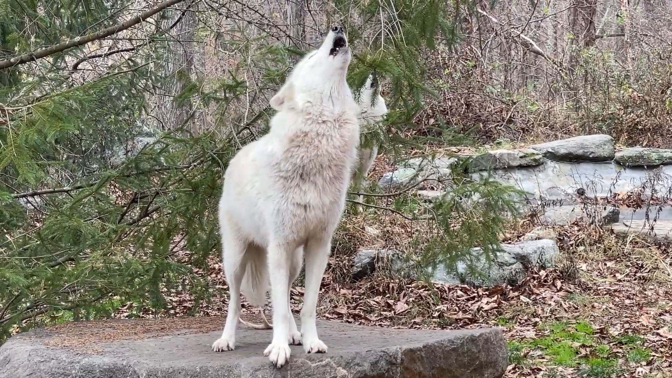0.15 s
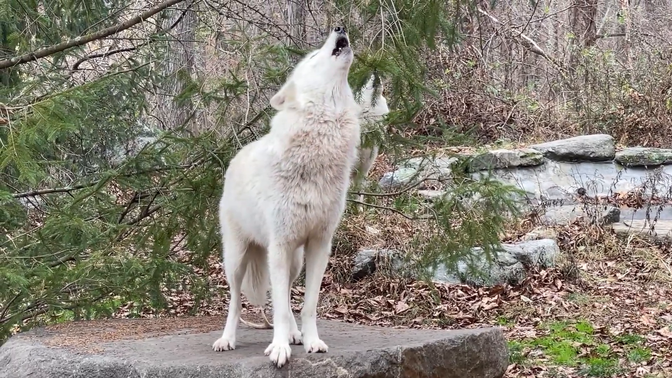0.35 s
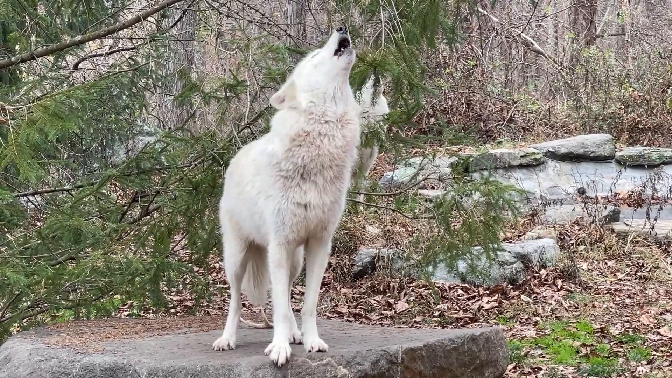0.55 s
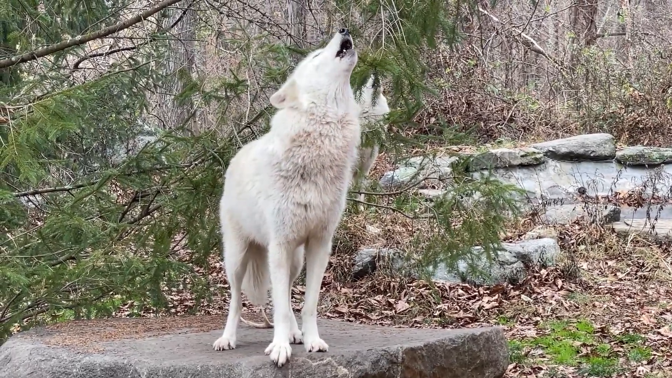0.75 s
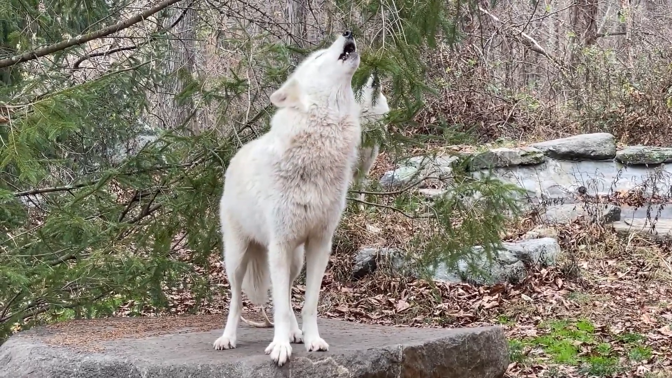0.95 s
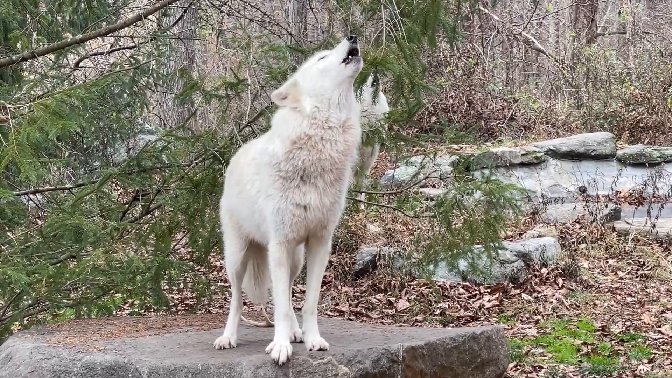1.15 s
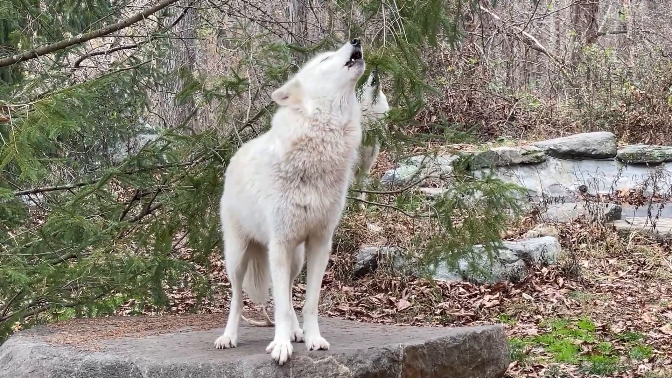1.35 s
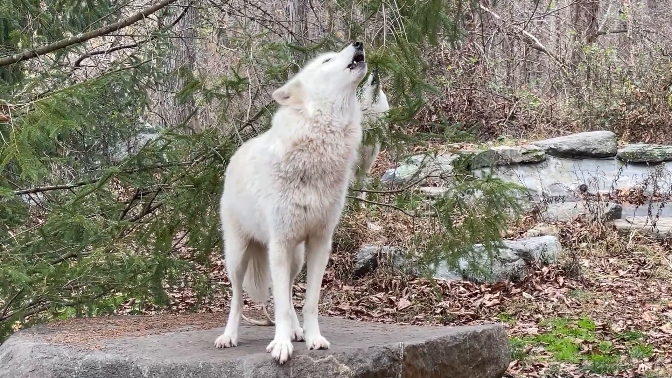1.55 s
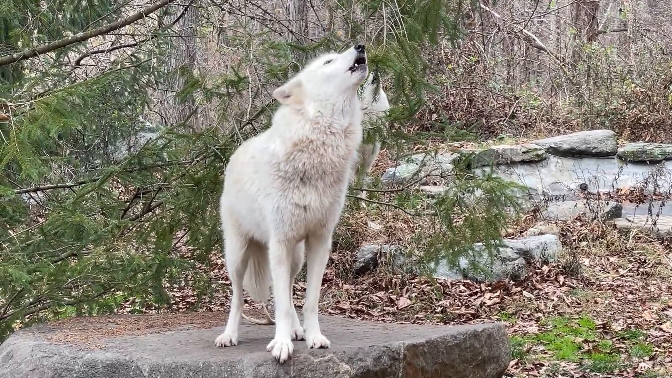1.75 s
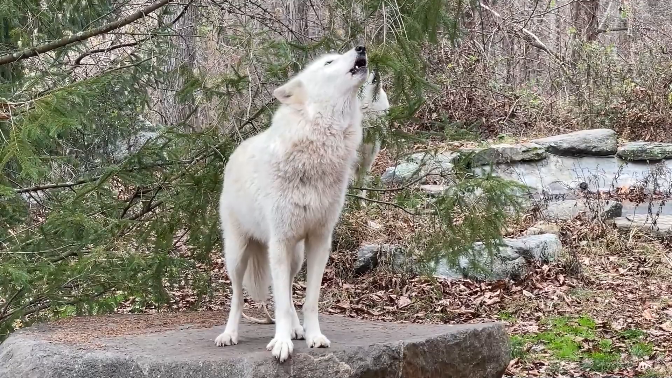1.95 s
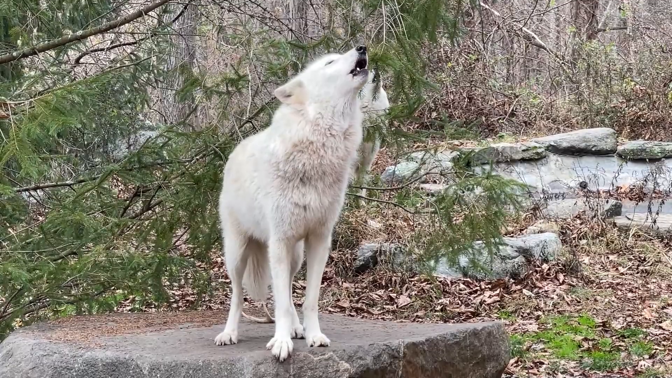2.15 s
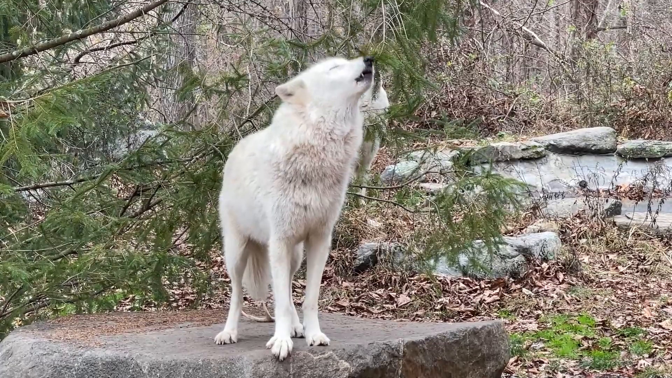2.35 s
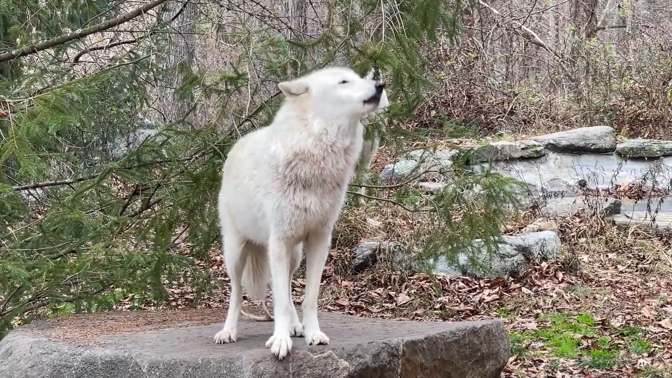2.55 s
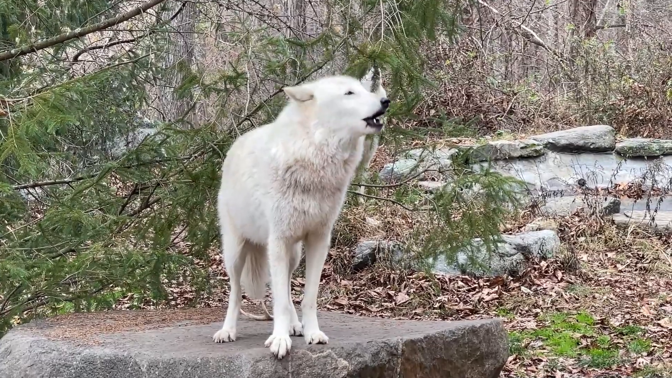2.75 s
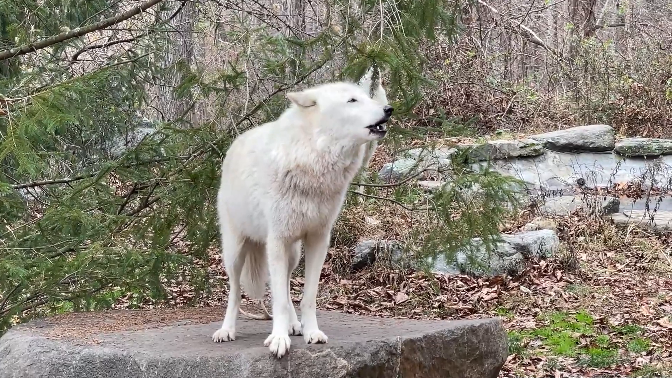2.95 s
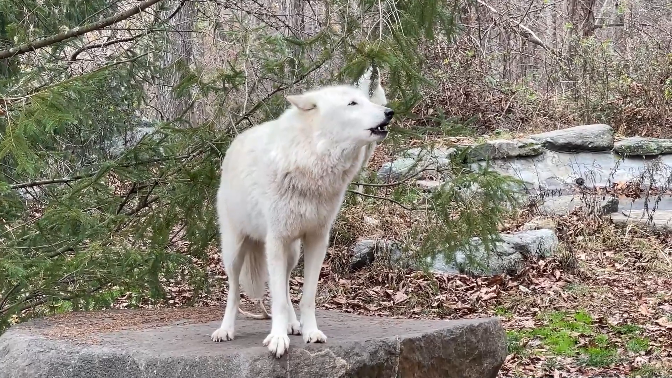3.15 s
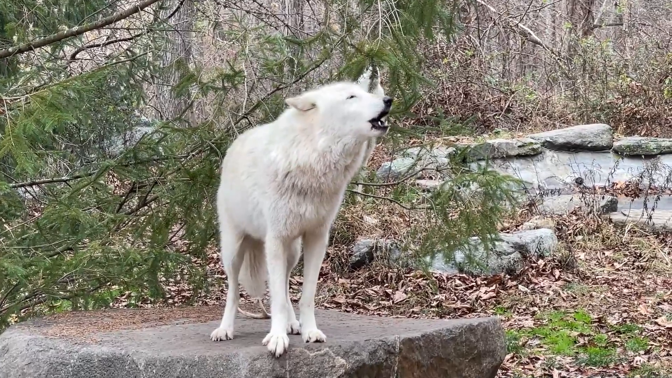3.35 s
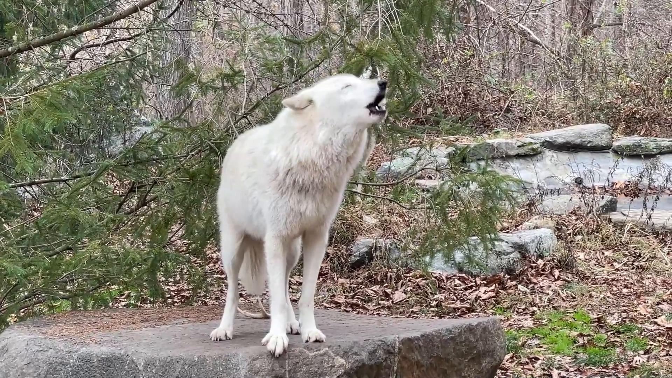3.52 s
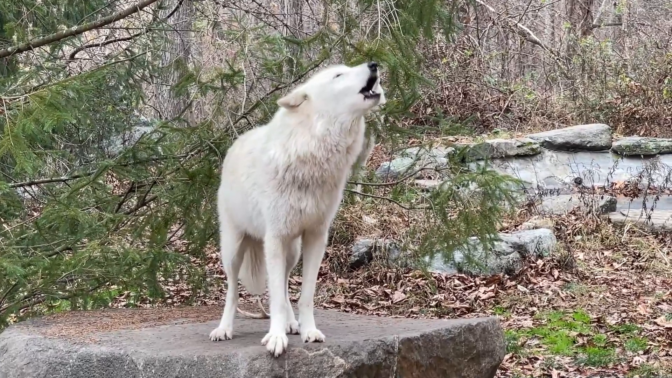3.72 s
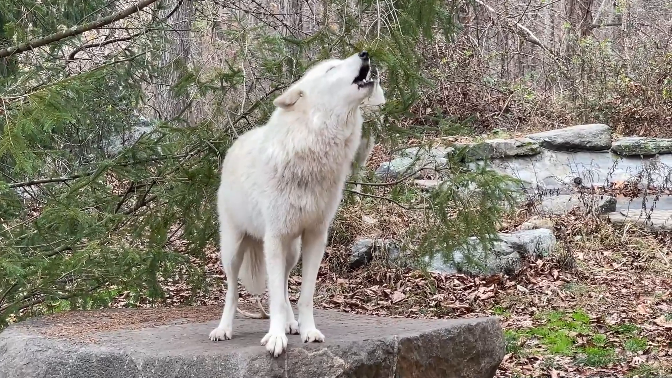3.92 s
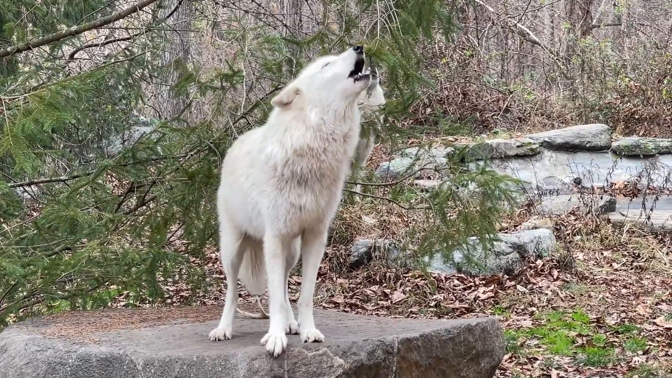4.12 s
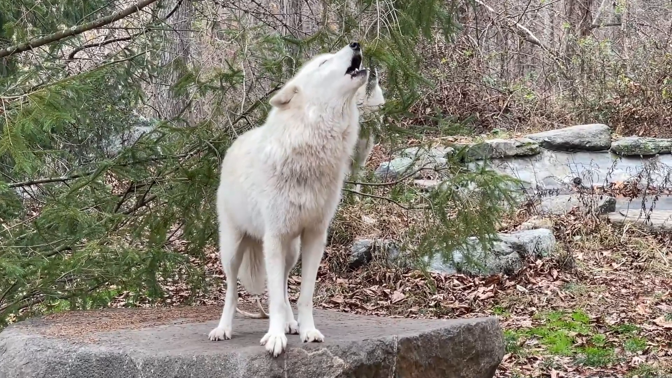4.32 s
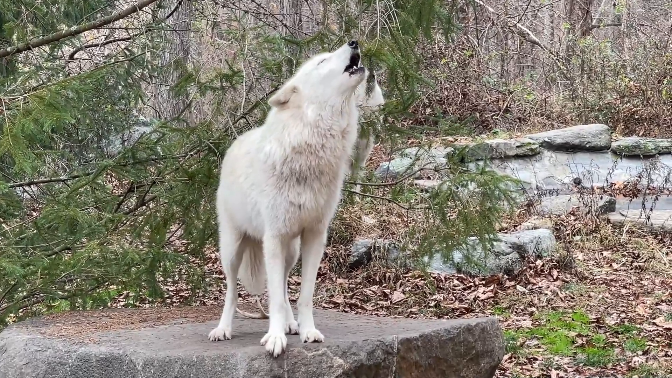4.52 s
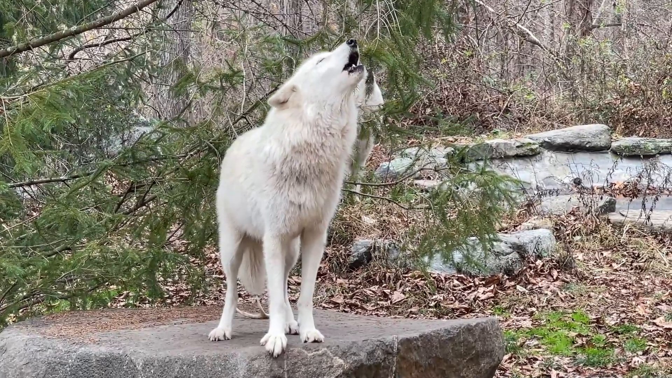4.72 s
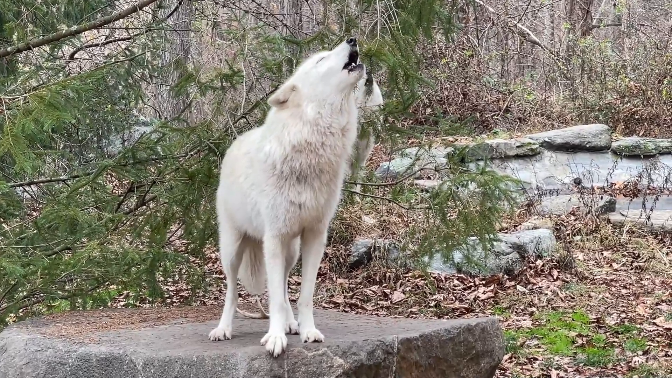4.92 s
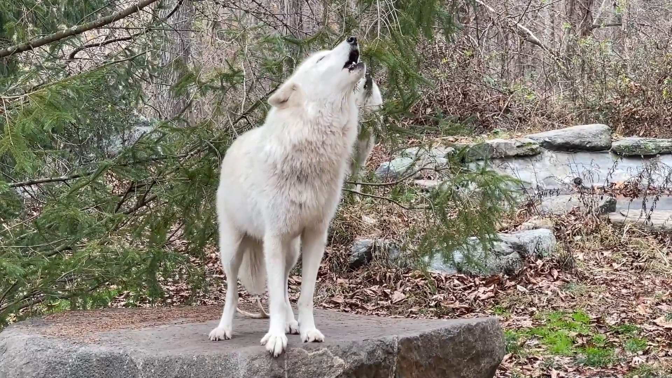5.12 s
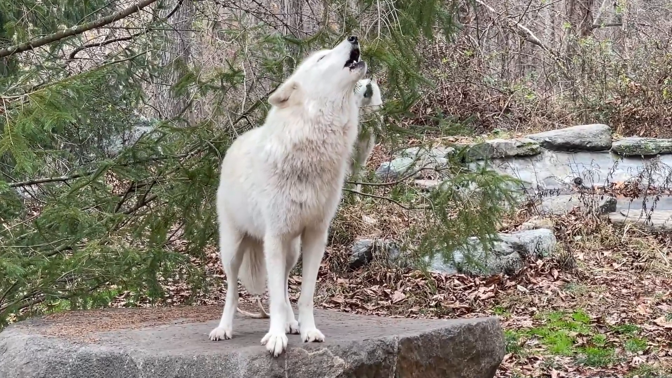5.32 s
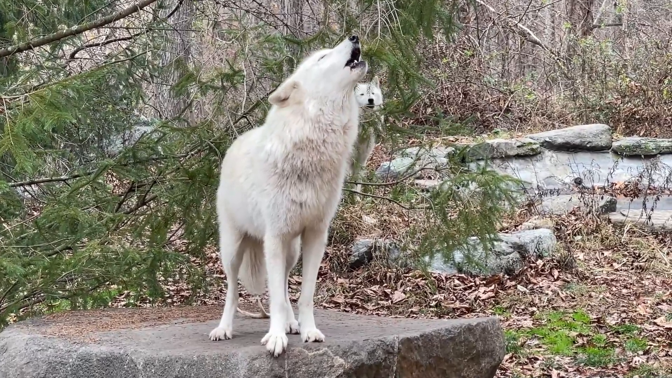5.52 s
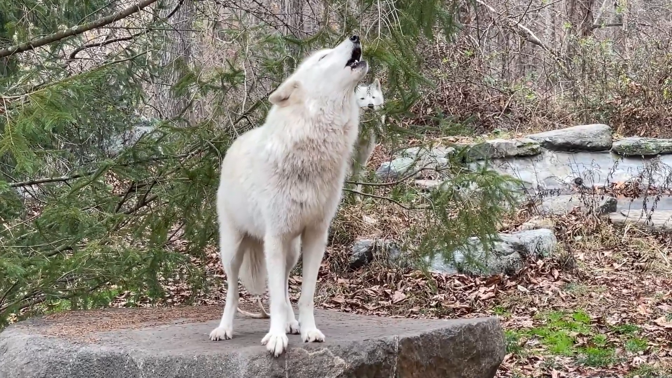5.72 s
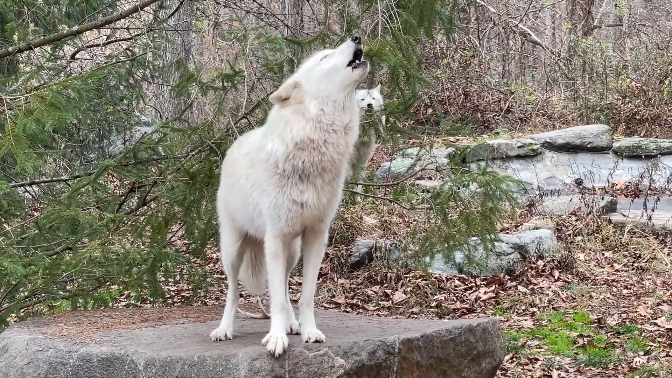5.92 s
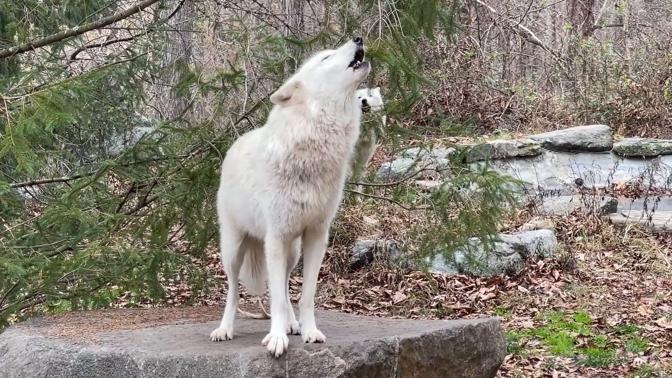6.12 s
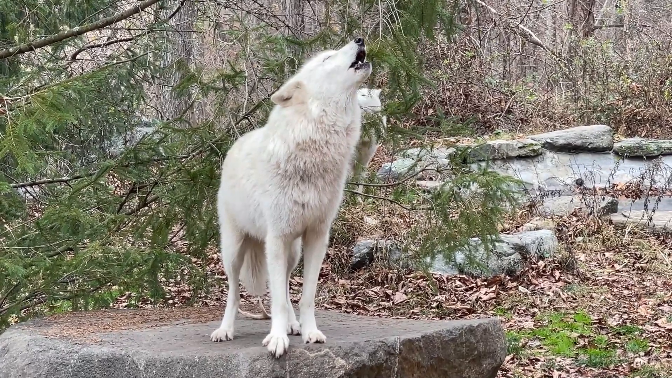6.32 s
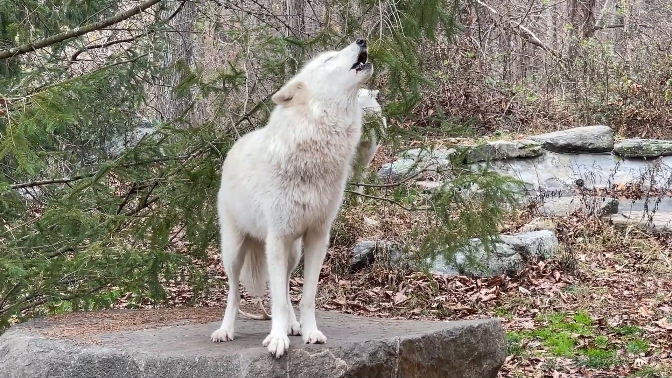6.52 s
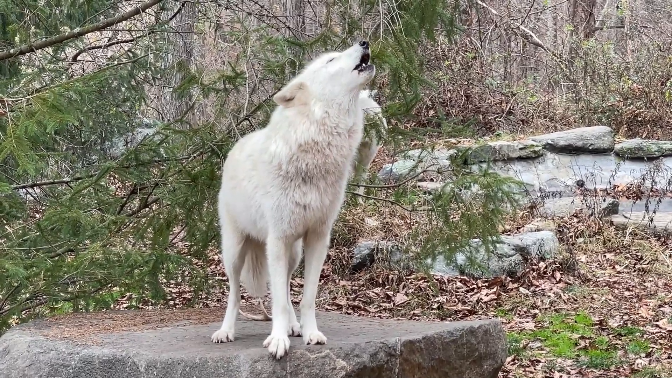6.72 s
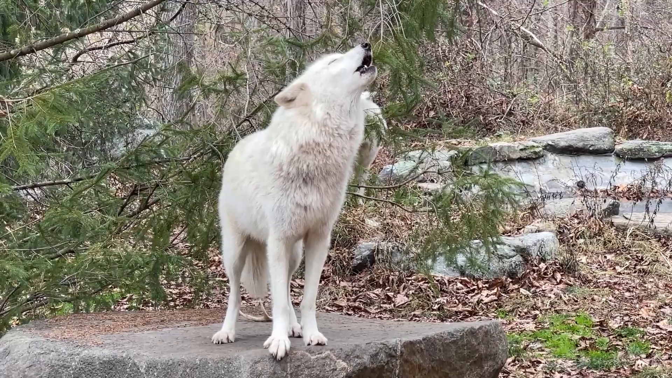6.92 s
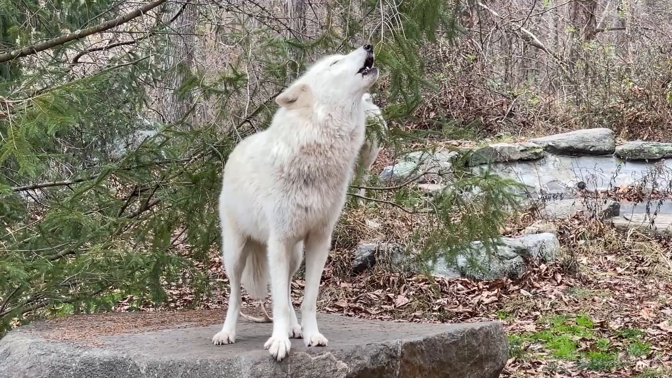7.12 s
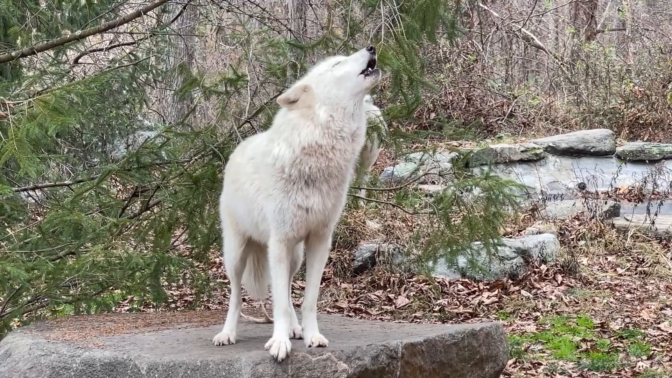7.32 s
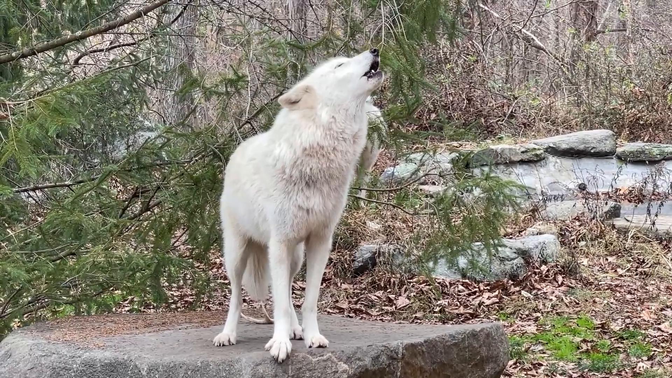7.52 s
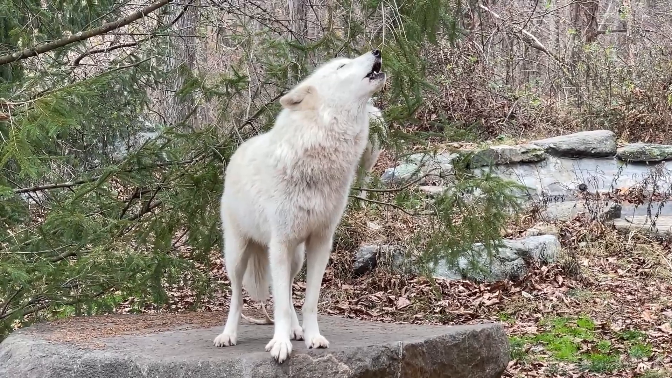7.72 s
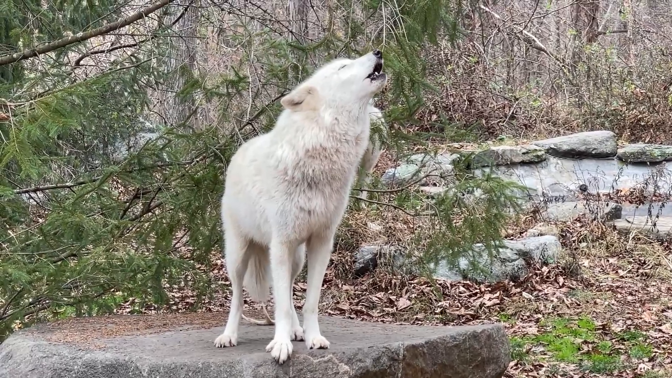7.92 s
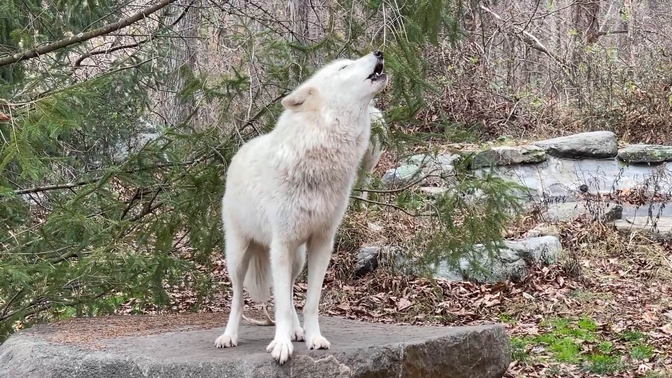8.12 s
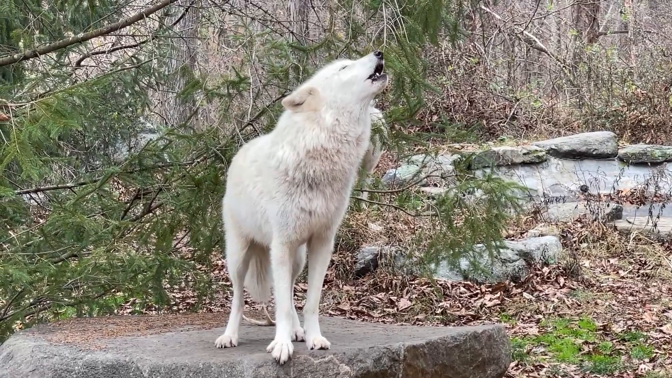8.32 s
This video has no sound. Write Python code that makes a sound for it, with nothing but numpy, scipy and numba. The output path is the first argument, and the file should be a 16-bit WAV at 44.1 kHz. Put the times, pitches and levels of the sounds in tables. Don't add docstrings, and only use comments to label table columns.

```python
import sys
import numpy as np
from scipy import signal
from scipy.fft import rfft, irfft
from scipy.io import wavfile
from scipy.ndimage import uniform_filter1d, minimum_filter1d
from numba import njit

SR = 44100
rng = np.random.default_rng(int(sys.argv[2]) if len(sys.argv) > 2 else 0)


def boost_factor(decibels):
    exponent = np.asarray(decibels, float) / 20
    return 10 ** exponent


def dump_mix(stems):
    frames = np.atleast_2d(stems).T
    limited = np.clip(frames, -1, 1)
    pcm = np.round(limited * 32767).astype(np.int16)
    wavfile.write(sys.argv[1], SR, pcm)


N = 373086
OPPOSITE = np.array([[1], [-1]])

# time_s, pitch_hz, level_db, mouth_opening_db
NEAR_HIGH = [(0.0, 477, -13.5, -52.5), (0.12, 470.3, -13, -50.5), (0.165, 451.3, -14.5, -50),
             (0.183, 410.5, -12, -49)]
NEAR_SAG = [(.24, 401, -14, -50), (.33, 395.7, -14, -51), (.56, 399, -14, -52.5), (.72, 412.2, -14, -49.5),
            (.85, 419, -13.5, -49), (1.3, 375.5, -15, -57), (1.6, 361.5, -14, -48), (1.87, 357.5, -14, -50),
            (1.91, 367.4, -13.5, -47.5)]
NEAR_RISE = [(1.95, 384.5, -13, -58.5), (2.05, 405.7, -12.5, -60), (2.11, 416.2, -13.5, -59)]
NEAR_STOP = [(2.16, 404, -14, -59.5), (2.19, 395, -30, -68.5), (2.23, 388, -54, -66)]
NEAR_CROAK = [(3.285, 366.9, -32, -48.5), (3.32, 345.3, -24.5, -66.5), (3.37, 351.3, -30, -43.5),
              (3.39, 384.6, -16, -50.5)]
NEAR_HOOT = [(3.393, 460, -36, -71), (3.402, 444.4, -10, -56.5), (3.5, 446, -10, -54.5),
             (3.521, 468.3, -12, -40)]
NEAR_SPLIT = [(3.527, 473, -15, -55.5), (3.57, 464.9, -25, -48.5), (3.73, 466.5, -22.5, -54.5),
              (3.79, 472.3, -16.5, -53.5), (3.9, 473.5, -15.5, -56.5), (4.15, 472.5, -16, -53.5),
              (4.3, 467.5, -19, -57), (4.39, 467, -23, -59), (4.94, 472, -33, -62.5)]
NEAR_MEND = [(4.955, 492.8, -23.5, -58), (4.97, 490.4, -15.5, -50), (5.0, 488.2, -12.5, -50),
             (5.05, 479.9, -11.5, -47.5), (5.082, 474.2, -11, -47), (5.105, 430.5, -7, -43)]
NEAR_LONG = [(5.12, 423.5, -10, -42), (5.6, 417, -10.5, -44), (5.8, 413.3, -10, -44)]
NEAR_DIM = [(6.05, 403.7, -10.5, -43), (6.25, 400.7, -10, -45.5)]
NEAR_LATE = [(6.5, 394.7, -10.5, -52), (6.8, 386.1, -10.5, -52), (7.1, 385.2, -12.5, -50.5),
             (7.55, 378.2, -11.5, -45.5), (8.1, 380.1, -11.5, -48.5), (8.46, 392.5, -11.5, -50)]
# note, second_partial_db, throat_pitch_ratio, treble_above_knee_db
NEAR_HOWLS = [
    [(NEAR_HIGH, 5.8, 1.08, 3.8), (NEAR_SAG, -5.5, 1.001, -10), (NEAR_RISE, -0.64, 1.001, -3),
     (NEAR_STOP, -1, 1.1, -2.5)],
    [(NEAR_CROAK, 7.2, 0.91, -8)],
    [(NEAR_HOOT, -9, 1.001, .1), (NEAR_SPLIT, -9, 0.96, 3)],
    [(NEAR_MEND, 0.92, 1.001, 12), (NEAR_LONG, -7.5, 0.96, -7.5), (NEAR_DIM, -13, 1.001, -8.5),
     (NEAR_LATE, -5, 0.99, -9.5)],
]
# time_s, pitch_hz, level_db, mouth_opening_db
FAR_HIGH = [(0.0, 801, -17, -22), (0.08, 792, -22, -22.5), (0.155, 780, -18, -19.5), (0.19, 748, -21, -21)]
FAR_SAG = [(.26, 706.7, -16.5, -28.5), (.5, 704.7, -16, -25.5), (.8, 699.7, -17.5, -30),
           (.93, 693, -18.5, -34), (1.06, 686.8, -17.5, -35)]
FAR_SINK = [(1.3, 672.3, -16.5, -28.5), (1.5, 647, -20, -30), (1.59, 621, -22, -31.5)]
FAR_DROP = [(1.65, 607.7, -21.5, -28), (1.68, 593.4, -24.5, -25.5)]
FAR_REED = [(1.7, 566, -28, -26), (1.87, 558.3, -28, -30), (2.15, 564.8, -31, -27.5),
            (2.45, 560.3, -23, -21.5), (2.6, 557.3, -24, -29), (2.85, 553.2, -23, -27),
            (3.2, 547.3, -25, -29.5), (3.38, 544, -32.5, -27.5), (3.43, 550.4, -31.5, -37)]
FAR_DIP = [(3.75, 548, -27.5, -30), (3.93, 544, -29, -38.5), (4.05, 541, -29, -33), (4.2, 542, -31.5, -33)]
FAR_FADE = [(4.3, 540.7, -34, -21.5), (4.9, 540.7, -25.5, -22.5), (4.97, 537.7, -21, -25.5),
            (5.04, 534.4, -26.5, -28), (5.1, 531.8, -35.5, -31)]
FAR_TAIL = [(5.2, 516.3, -38.5, -37.5), (5.3, 508, -46.5, -33.5), (5.36, 482.5, -50.5, -32),
            (5.41, 457, -42.5, -49.5)]
FAR_SIGH = [(5.395, 404.4, -44.5, -44), (5.43, 375.5, -49, -44.5), (5.47, 391.7, -54, -67)]
FAR_WHINE = [(6.02, 352.4, -64, -64), (6.09, 313.5, -57, -60.5), (6.16, 310.2, -55, -60.5),
             (6.25, 337.1, -49.5, -55), (6.32, 352, -49, -57), (6.39, 353.7, -47.5, -59.5)]
FAR_CLIMB = [(6.43, 322.3, -46, -54.5), (6.5, 312.3, -49.5, -54), (6.6, 309.9, -41.5, -46.5),
             (6.8, 333.5, -45, -44.5), (6.9, 357.7, -32.5, -44), (7.0, 369, -25.5, -43),
             (7.1, 380, -26, -37), (7.38, 421.8, -31, -34), (7.4, 436.6, -30, -36)]
FAR_WAVER = [(7.4, 496, -37.5, -48), (7.46, 509.2, -40, -43), (7.55, 521, -42.5, -40.5),
             (7.605, 511.8, -42.5, -41), (7.72, 538, -44, -38.5), (7.8, 545, -37.5, -38.5),
             (7.97, 534, -40.5, -38), (8.02, 528, -49.5, -37.5)]
FAR_LIFT = [(8.07, 523, -41, -39.5), (8.165, 517, -46, -39.5), (8.22, 546, -38, -37.5),
            (8.3, 573.5, -40, -32), (8.4, 580, -39.5, -30.5), (8.46, 571, -35.5, -31.5)]
# note, second_partial_db, throat_pitch_ratio, treble_above_knee_db
FAR_HOWLS = [
    [(FAR_HIGH, -36.5, .815, 0.9), (FAR_SAG, -25, .903, .1), (FAR_SINK, -16.5, 1.01, .1),
     (FAR_DROP, -5, .93, .1), (FAR_REED, 3, 1.001, .1), (FAR_DIP, 1.9, 1.001, -.6),
     (FAR_FADE, -9.5, 0.947, -2), (FAR_TAIL, -8, 0.91, -10)],
    [(FAR_SIGH, 5.7, .9, -18)],
    [(FAR_WHINE, -2.5, 0.77, -4), (FAR_CLIMB, -0.57, .92, -12)],
    [(FAR_WAVER, 7.2, 1.1, -14), (FAR_LIFT, 6.2, 1.1, -2.5)],
]
NEAR_MOUTH_SHARE, FAR_MOUTH_SHARE = 0.48, 0.8
KNEE_HZ = 2670
# frequency_hz, level_db
FIRST_THROAT = [(1050, -1), (1250, 0), (1400, -13.5), (1510, -25.5), (1600, -9.5), (1700, -5.5),
                (1850, -12), (2000, 1.5), (2230, 1.5), (2400, -26.5), (3000, -21.5), (3450, -23),
                (3950, -33), (4350, -16.5), (4800, -28), (5750, -26), (6400, -35), (9000, -48.5),
                (11000, -36.5), (12000, -56)]
# frequency_hz, level_db
NEAR_THROAT = [(1170, 3.5), (1270, -2), (1530.0, -31), (1690.0, 4.5), (1950.0, 0), (2200.0, -0.5),
               (2400.0, -34.5), (3000.0, -28.5), (3700, -20.5), (4100, -32.5), (4600.0, -31), (5300, -26),
               (5800, -26.5), (6100, -39.5), (6600.0, -34), (7500, -44), (11000.0, -36), (12000.0, -57.5)]
# frequency_hz, level_db
FAR_THROAT = [(900, -10.5), (1200, 2.5), (1450, -15), (1700, -28), (2200, -34), (2800, -39), (3400, -45),
              (3900, -27), (4150, -39), (4450, -35), (4700, -52.5), (5600, -54), (6150, -65), (6650, -46),
              (7200, -53.5), (7750, -67), (8350, -53.5), (12000, -62.5)]

# start_s, end_s, rise_s, level_over_idle_db, lower_resonances_db
GAPES = [
    (-.2, 0.152, .1, 30, -9.5),
    (1.7, 3.45, .6, 9.5, -4),
    (3.474, 5.092, 0.2, 24.5, -3),
    (4.35, 5.098, .3, 4.5, -0.5),
]
AIR_IDLE_DB, GAPE_CLOSE_S = -88, 0.055
WOOD_T60_S, WOOD_ECHO_DB = 0.98, -21.5
# frequency_hz, level_db
WOOD = [(20, -33), (55, -17.5), (80, -4.5), (115, 2), (160, -1.5), (220, -7), (330, -1.5), (700, -4),
        (1200, -17.5), (2000, -26.5), (4000, -32), (8000, -53), (12500, -59.5), (15500, -71.5)]
# time_s, level_db
TRAFFIC = [(0, 1.5), (.9, -4), (1.6, -0.5), (3.2, 2), (5.5, -1), (6.6, -0.5), (7.6, 1), (8.46, 5)]
HUM_DB, DUCK, DUCK_S = -65, 0.54, 0.53
# start_s, peak_db, pitch_hz
KNOCKS = [
    (8.192, -39, 110.2),
    (8.28, -34.5, 131.7),
]
# start_s, length_s, level_db,
# throat_hz
CRACKS = [(1.9, 0.014, -47.5, 1300), (5.22, .17, -42, 680), (4.96, .13, -40.5, 570),
          (7.385, 0.056, -40.5, 970), (6.1, 0.043, -45, 750), (3.2, 0.058, -38, 900)]
CRACK_WIDTH_HZ = 370

# start_s, peak_db, length_s
CROAK_THROBS = [(3.222, -10, 0.015), (3.24, -6.5, 0.0078), (3.249, -3.5, .01), (3.26, -5.5, 0.013),
                (3.272, -1.5, .015), (3.293, -12, 0.016), (3.311, -9, .018), (3.332, -5, 0.026),
                (3.358, -8.5, 0.029)]
# start_s, peak_db, length_s
THROBS = [(4.241, -5.5, 0.013), (4.265, -10.5, 0.011), (4.286, -5.5, 0.021), (4.309, -7.5, 0.0069),
          (4.328, -11, .046), (4.371, -2, .014), (4.41, -4.5, .016), (4.431, -11, 0.011),
          (4.444, -2, 0.016), (4.467, -6, .014), (4.49, -16.5, 0.0091), (4.512, -3, .014),
          (4.529, -12.5, 0.027), (4.559, -7, 0.011), (4.581, -8, 0.01), (4.605, -6.5, 0.011),
          (4.627, -7, 0.01), (4.644, -4, 0.02), (4.684, -8, .03), (4.718, -5, 0.014), (4.741, -7, 0.012),
          (4.769, -6, 0.0082), (4.782, -8, .014), (4.801, -7, 0.015), (4.824, -4.5, 0.013),
          (4.842, -8.5, 0.024), (4.87, -4.5, 0.015), (4.896, -5.5, 0.016), (4.922, -7, 0.023),
          (4.958, -5, 0.031)]
THROB_EDGE, THROB_LEAN = 0.38, 1.05
THROB_SAG = .15
# time_s, rate_hz
FOLD = [(3.288, 486.8), (3.305, 175.1), (3.385, 185.5), (3.401, 472.3), (4.199, 506), (4.348, 560.6),
        (4.7, 544.6), (4.95, 493.3)]
FOLD_STRAY = .045
# (time_s, strength_db)
RASPS = [
    (-10, -7, [(3.21, -31.5), (3.235, -14), (3.25, -8), (3.28, -7.5), (3.3, -7), (3.34, -7), (3.38, -10), (3.405, -1)]),
    (-3, -0.5, [(3.51, -27.5), (3.528, -14), (3.55, -46)]),
    (-7, -28.5, [(4.0, -38.5), (4.25, -7.5), (4.37, -3), (4.41, -1), (4.8, 2), (4.95, 3.5), (4.985, -12.5)]),
]
# frequency_hz, width_hz, level_db
CROAK_THROAT = [(490, 270, 0), (860, 280, -5), (1010, 150, -7.5), (1350, 150, -6.5), (2050, 350, -7.5),
                (2500, 250, 0), (2930, 350, -6.5), (3450, 300, -12.5)]
# frequency_hz, width_hz, level_db
RASP_THROAT = [(517, 340, 1.5), (890, 67, -19.5), (1016, 150, -7.5), (1170, 49, 1.5), (1900, 180, -11.5),
               (2000, 250, -7), (2700, 200, -18), (3300, 140, -11), (3605, 200, -10.5), (3900, 110, -14.5),
               (4500, 160, -15.5), (4900, 120, -13), (5240, 97, -10.5), (5700, 180, -11)]

# time_s, pitch_hz, level_db, roughness_0_to_1, coupling_with_note_db
SPLIT = [(3.522, 645.1, -29.5, .5, -9.5), (3.56, 695.3, -34, .05, 2.5), (3.61, 708, -34, .06, -10.5),
         (3.72, 700.5, -29, 0.07, -9.5), (3.79, 698, -29, 0.05, -0.8), (3.9, 696.5, -30, .05, 1),
         (4.0, 689, -28.5, 0.2, 1.5), (4.1, 681, -29.5, 0.2, 1.8), (4.155, 667.3, -27, .12, 0.9),
         (4.22, 657, -24.5, .35, 1.1), (4.4, 632.3, -18, 0.8, -4), (4.8, 616.6, -19.5, 0.8, -3.7),
         (4.975, 578.5, -20, 0.9, -3.5)]
# note_multiple, second_pitch_multiple, level_db, coupling_share
SPLIT_TONES = [(0, 1, 3, 0.24), (-1, 2, -2.5, 0.73), (0, 2, 0.5, 0.016), (1, 1, -10, 2), (1, 2, -3.5, 0.5),
               (0, 3, -10, 0.48), (-2, 4, -15, 1.6), (-1, 4, -23.5, 1.5), (0, 4, -25.5, 0.52),
               (3, -1, -8.5, -0.53), (-2, 2, -20.5, 2.1), (-1, 3, -27, 1.2), (2, 3, -47.5, 0.73),
               (1, 4, -32, -0.045), (3, 3, -33, .3), (2, 4, -27, 0.61), (0, 6, -30, -1.1),
               (2, 5, -24.5, -0.47), (0, 8, -32.5, -.9), (2, 6, -38, -0.26), (5, 5, -38, -0.42),
               (-4, 4, -19, 1.6), (3, 1, -24, 0.49), (-1, 7, -31, 1.2), (5, 3, -33, 0.62),
               (3, 6, -37, 0.69), (6, 4, -37, .9), (4, 1, -25, 0.39), (4, 0, -13.5, 1.3),
               (11, 0, -32.5, 0.46), (12, 0, -31, 0.33), (8, 1, -30, 0.54)]
SPLIT_WAVER_DB, ROUGH_DULL_DB = 1.5, 13.5
# time_s, level_db
SPLIT_SWELL = [(3.6, -2), (3.64, 6.5), (3.71, 2.5), (3.809, -9.5), (3.849, 2), (3.931, 5), (3.98, -6),
               (4.02, 1.5), (4.135, 0.5), (4.17, -8.5), (4.21, 0), (4.3, 0)]
# frequency_hz, level_db
POCKET = [(200, -15.5), (320, -4), (420, 3.5), (1400, -2), (1550, -17.5), (1680, -4.5), (2250, 3.5),
          (2450, -13), (2800, 0.5)]
CHEEK_HZ, CHEEK_WIDTH_HZ, CHEEK_DB = 690, 270, -6


def curve(table):
    s, *columns = np.transpose(table)
    t = np.arange(N) / SR
    since_start = t - s[0] + (s[0] < .01)
    until_end = s[-1] - t + (s[-1] > 8.4)
    gate = np.clip(np.minimum(since_start, until_end) / .008, 0, 1)
    at = np.flatnonzero(gate)
    return slice(at[0], at[-1] + 1), gate[at], [np.interp(t[at], s, c) for c in columns]


def follow(table):
    return np.interp(np.arange(N) / SR, *np.transpose(table))


def walk(n, rate):
    k = int(SR / rate)
    steps = np.repeat(rng.standard_normal(n // k + 2), k)
    return np.sqrt(1.5) * uniform_filter1d(steps, k)[:n]


def colour(x, points):
    hz, db = np.transpose(points)
    f = np.fft.rfftfreq(x.shape[-1], 1 / SR) + 1
    return irfft(rfft(x) * boost_factor(np.interp(np.log(f), np.log(hz), db)), x.shape[-1])


def ring(x, hz, width):
    b, a = signal.iirpeak(hz, hz / width, SR)
    return signal.lfilter(b, a, signal.lfilter(b, a, x))


def unit(x):
    return x / np.sqrt(np.mean(x ** 2))


def chain(notes, share):
    rows = []
    for note, second_db, ratio, treble_db in notes:
        for s, hz, db, mouth_db in note:
            second = (1 - share) * db + share * mouth_db + second_db
            rows.append((s, hz, ratio, treble_db, db, second, mouth_db))
    return np.array(rows)


def howl(calls, throat, jitter, shimmer_db):
    out, phase = np.zeros(N), np.zeros(N)
    throat_hz, throat_db = np.transpose(throat)
    for call in calls:
        span, gate, (hz, ratio, treble_db, *low_db, mouth_db) = curve(call)
        n = len(hz)
        turn = 2 * np.pi * np.cumsum(hz * (1 + jitter * walk(n, 90))) / SR
        phase[span] = turn
        for k in range(1, int(12000 / hz.mean())):
            if k <= len(low_db):
                db = low_db[k - 1]
            else:
                db = mouth_db + np.interp(k * hz / ratio, throat_hz, throat_db, right=-120)
                db = db + treble_db * np.clip(k * hz / KNEE_HZ * 4 - 4, 0, 1)
                db = db + shimmer_db * walk(n, 3.01) + 0.33 * walk(n, 70)
            out[span] += np.sqrt(2) * gate * boost_factor(db) * np.sin(k * turn + k * k)
    return out, phase


def air(note_phase):
    t = np.arange(N) / SR
    level_db, low_db = np.zeros(N), np.zeros(N)
    for start, end, rise_s, gape_db, gape_low_db in GAPES:
        gape = np.clip(np.minimum((t - start) / rise_s, (end - t) / GAPE_CLOSE_S + 1), 0, 1)
        level_db += gape_db * gape
        low_db += gape_low_db * gape
    puff = (1 + 0.92 * np.cos(note_phase)) * boost_factor(2.5 * walk(N, 40))
    mid, side = rng.standard_normal((2, N)) * puff
    puffs = colour(mid + 0.63 * side * OPPOSITE, [(11400, 1.5), (12500, -20.5)])
    low = ring(puffs, 5650, 500) + boost_factor(1.0) * ring(puffs, 3650, 500) + boost_factor(1.5) * ring(puffs, 6500, 500)
    high = ring(puffs, 11000, 630) + boost_factor(-10) * ring(puffs, 9500, 700) + boost_factor(-13.5) * ring(puffs, 8400, 500)
    return boost_factor(AIR_IDLE_DB + level_db) * (high + boost_factor(low_db) * low) / high.std()


def echoes(x):
    t = np.arange(int(1.2 * SR)) / SR
    tail = rng.standard_normal((2, len(t))) * boost_factor(-60 * t / WOOD_T60_S) * np.clip(t / 0.036, 0, 1)
    bark = [(60, -47.5), (250, -19.0), (500, 0.0), (1200, 5.5), (4000, 9.5), (9000, -45.5)]
    mid, side = colour(tail, bark)
    pair = (mid + 0.6 * side * OPPOSITE) / np.sqrt(np.sum(mid ** 2))
    return boost_factor(WOOD_ECHO_DB) * signal.fftconvolve(x[None], pair, axes=1)[:, :N]


def wood(wolves):
    loud_db = 10 * np.log10(uniform_filter1d(wolves ** 2, int(DUCK_S * SR)) + 1e-4)
    level_db = HUM_DB - DUCK * loud_db + follow(TRAFFIC)
    mid, side = colour(rng.standard_normal((2, N)), WOOD)
    bed = (mid + boost_factor(-14.0) * side * OPPOSITE) / mid.std() * boost_factor(level_db + 6.5 + 1.0 * walk(N, 1.1))
    t = np.arange(int(.08 * SR)) / SR
    swell = np.sin(np.pi * t / t[-1]) * np.exp(-t / 0.0097) * 10.0
    for s, db, hz in KNOCKS:
        bed[:, int(s * SR):][:, :len(t)] += boost_factor(db) * swell * np.sin(2 * np.pi * hz * t)
    return bed


def cracks():
    out = np.zeros(N)
    for s, length_s, db, hz in CRACKS:
        n = int(length_s * SR)
        noise = unit(ring(rng.standard_normal(n), hz, CRACK_WIDTH_HZ))
        out[int(s * SR):][:n] += boost_factor(db + 3.7 * walk(n, 80)) * np.hanning(n) * noise
    return out


def throbs():
    out, sag = np.zeros(N), np.ones(N)
    for s, db, length_s in list(CROAK_THROBS) + list(THROBS):
        n = int(length_s * SR)
        part = np.arange(n) / n
        out[int(s * SR):][:n] += boost_factor(db) * np.abs(np.sin(np.pi * part ** THROB_LEAN)) ** (2 * THROB_EDGE)
        sag[int(s * SR):][:n] = 1 + THROB_SAG * (.5 - part)
    return out, sag


def rasp(burst, sag):
    out = np.zeros(N)
    rate_hz = follow(FOLD) * (1 + FOLD_STRAY * walk(N, 45)) * sag
    for (upper_db, between_db, effort), throat in zip(RASPS, (CROAK_THROAT, RASP_THROAT, RASP_THROAT)):
        span, gate, (strength_db,) = curve(effort)
        n = len(gate)
        turn = 2 * np.pi * np.cumsum(rate_hz[span] * (1 + .022 * walk(n, 260))) / SR
        slow = 520 / rate_hz[span]
        snap = np.exp(2.5 * slow ** 2 * (np.cos(turn) - 1)) * slow
        snap = unit(snap * boost_factor(1.6 * walk(n, 300)) * (1 + .13 * rng.standard_normal(n)))
        folds = (snap - uniform_filter1d(snap, SR // 50)) * (burst[span] + boost_factor(between_db))
        low = sum(boost_factor(db) * ring(folds, hz, width) for hz, width, db in throat[:2])
        high = sum(boost_factor(db) * ring(folds, hz, width) for hz, width, db in throat[2:])
        out[span] += gate * boost_factor(strength_db - 5.0) * (low + boost_factor(upper_db + 12) * high)
    return out


def split_voice(note_phase, burst):
    out = np.zeros(N)
    span, gate, (hz, level_db, rough, coupling_db) = curve(SPLIT)
    n_samples = len(hz)
    rough = np.clip(rough, 0, 1)
    turn = 2 * np.pi * np.cumsum(hz * (1 + 0.054 * rough * walk(n_samples, 260))) / SR
    gate = gate * (1 - rough + rough * (0.032 + 0.55 * burst[span]))
    for m, n, tone_db, share in SPLIT_TONES:
        db = level_db + tone_db + share * coupling_db + SPLIT_WAVER_DB * walk(n_samples, 12)
        if m + n > 4:
            db = db - ROUGH_DULL_DB * rough
        if m == 0 and n == 1:
            db = db + follow(SPLIT_SWELL)[span]
        out[span] += np.sqrt(2) * gate * boost_factor(db) * np.sin(m * note_phase[span] + n * turn)
    return out


def place(x, pan_db, bounce, late_s):
    late = np.r_[np.zeros(int(late_s * SR)), x][:N]
    return x * boost_factor(pan_db * OPPOSITE / 2) + bounce * late * OPPOSITE


def scene():
    first_call = [chain(NEAR_HOWLS[0], NEAR_MOUTH_SHARE)]
    later_calls = [chain(c, NEAR_MOUTH_SHARE) for c in NEAR_HOWLS[1:]]
    far_calls = [chain(c, FAR_MOUTH_SHARE) for c in FAR_HOWLS]
    first, first_phase = howl(first_call, FIRST_THROAT, jitter=.001, shimmer_db=1.5)
    later, later_phase = howl(later_calls, NEAR_THROAT, jitter=.001, shimmer_db=1.2)
    phase = first_phase + later_phase
    far, _ = howl(far_calls, FAR_THROAT, jitter=.0015, shimmer_db=1.3)
    far = far + cracks()
    burst, sag = throbs()
    rough = colour(rasp(burst, sag) + split_voice(phase, burst), POCKET)
    near = first + later + rough
    wolves = place(near, pan_db=.5, bounce=0.018, late_s=0.00071)
    wolves = wolves + place(far, pan_db=1.64, bounce=0.15, late_s=0.00086)
    wolves = wolves + boost_factor(CHEEK_DB) * ring(rough, CHEEK_HZ, CHEEK_WIDTH_HZ) * OPPOSITE
    return wolves + air(phase) + echoes(near + boost_factor(2.0) * far) + wood(near + far)


@njit
def gain_steps(peak, top, release, margin):
    gain, held = np.ones(len(peak)), peak[:400].max()
    for i in range(1, len(peak) - 1):
        held = max(held * release, top)
        if peak[i] > margin * held and peak[i] > peak[i + 1]:
            held = peak[i]
        gain[i] = np.sqrt(top / held)
    return gain


def band_limit(x):
    return signal.sosfilt(signal.butter(12, 15830, fs=SR, output="sos"), x)


def record(dry):
    peak, k = np.abs(dry).max(axis=0), int(0.0032 * SR)
    ceiling = uniform_filter1d(minimum_filter1d(np.minimum(1, .52 / (peak + 1e-9)), k), k)
    steps = gain_steps(peak * ceiling, .27, np.exp(-1 / (.25 * SR)), 1.011)
    steps = steps / uniform_filter1d(steps, int(.04 * SR))
    stop = np.clip((N - np.arange(N)) / (.001 * SR), 0, 1)
    return band_limit(ceiling * steps * stop * dry)


dry = scene()
out = record(dry)
dump_mix(out)
```